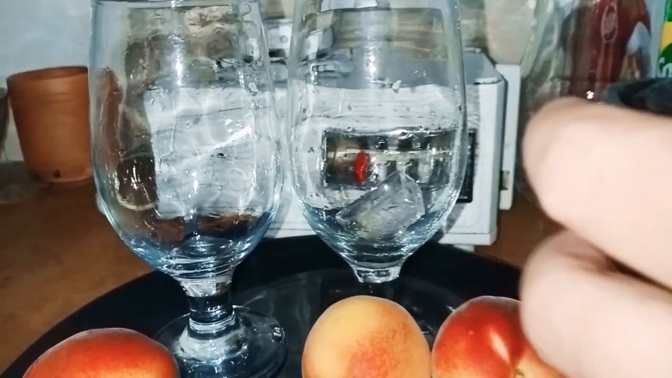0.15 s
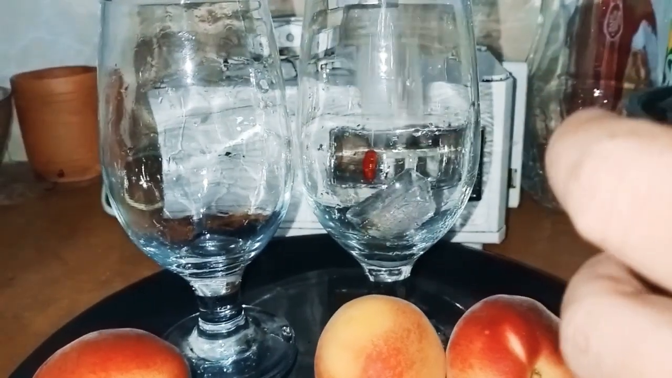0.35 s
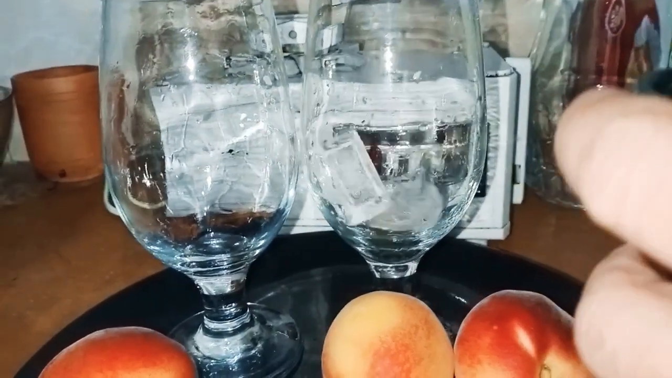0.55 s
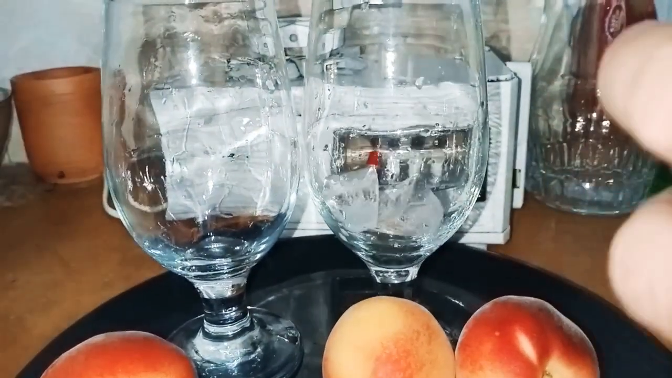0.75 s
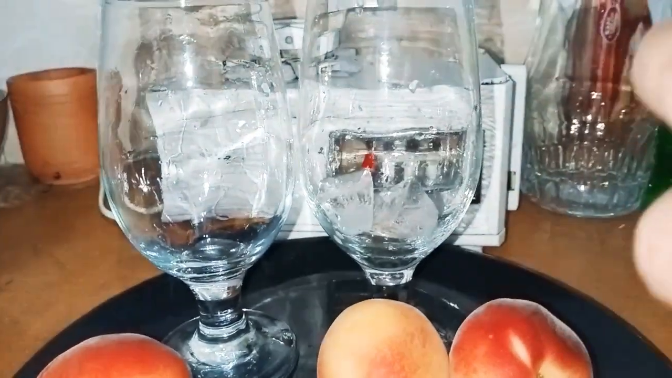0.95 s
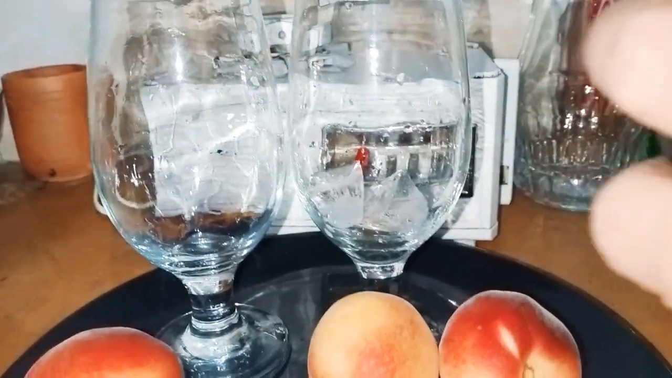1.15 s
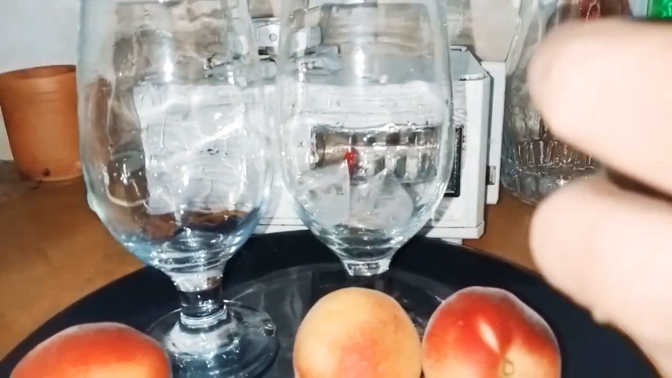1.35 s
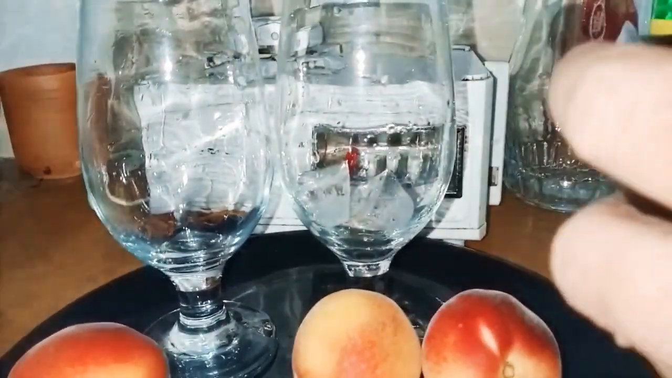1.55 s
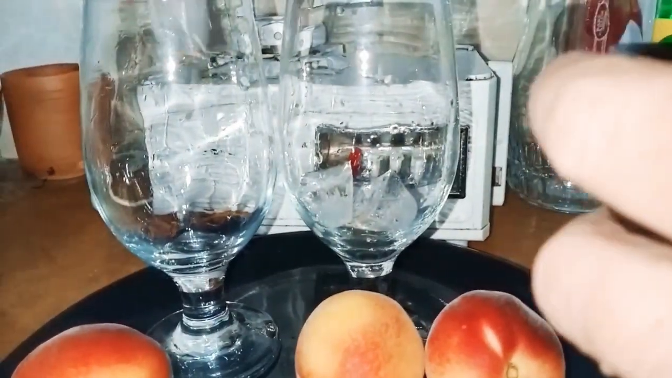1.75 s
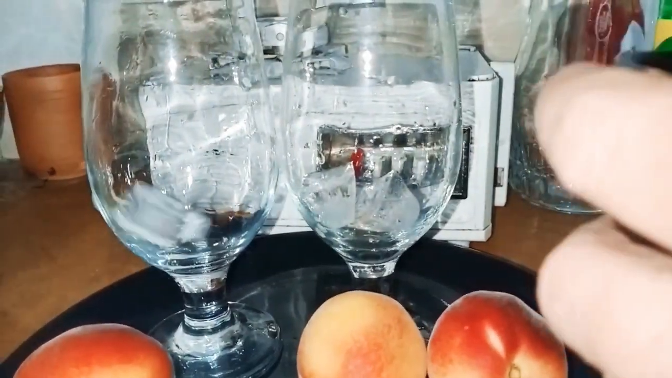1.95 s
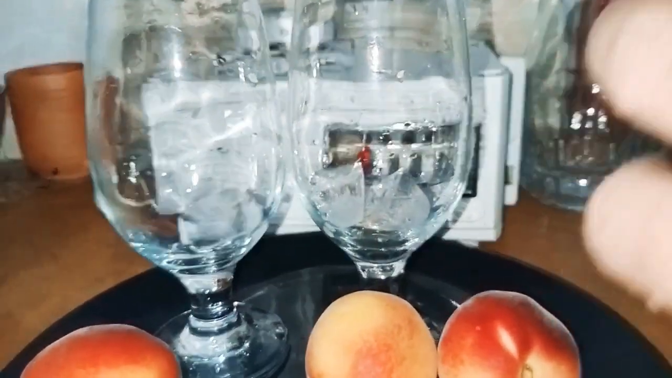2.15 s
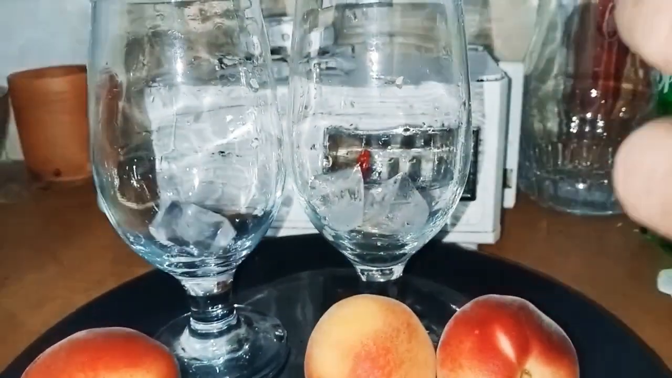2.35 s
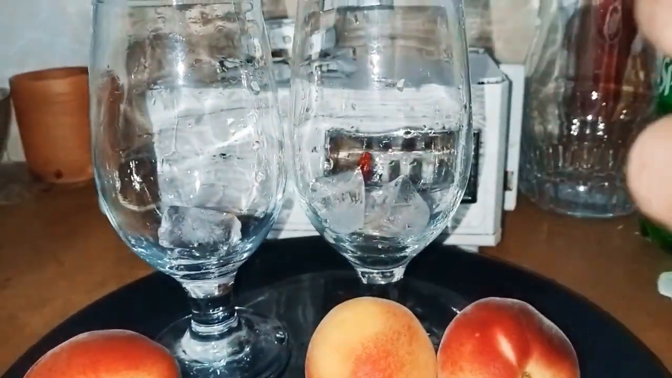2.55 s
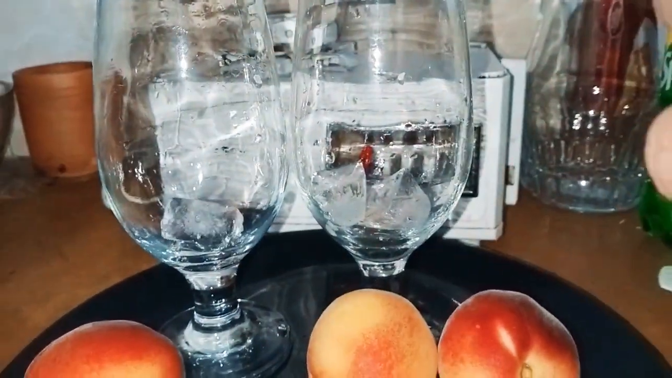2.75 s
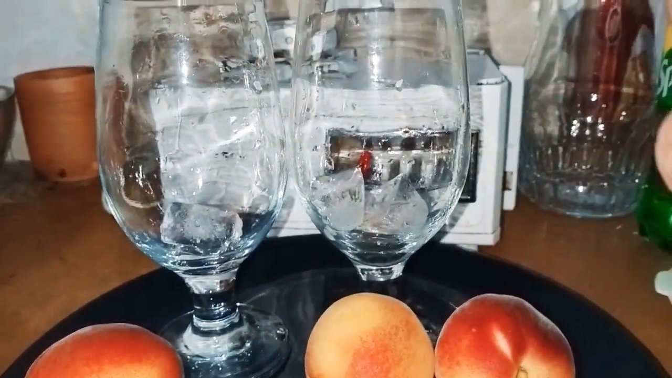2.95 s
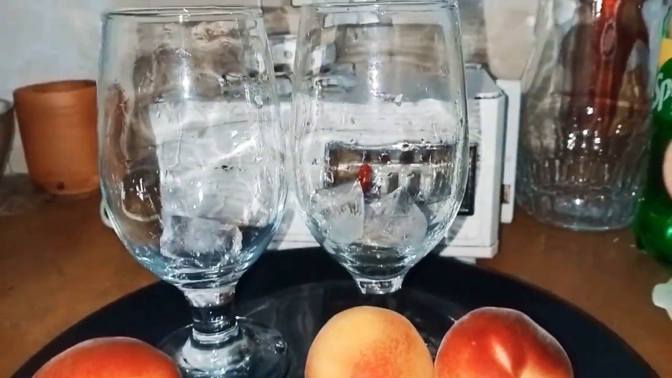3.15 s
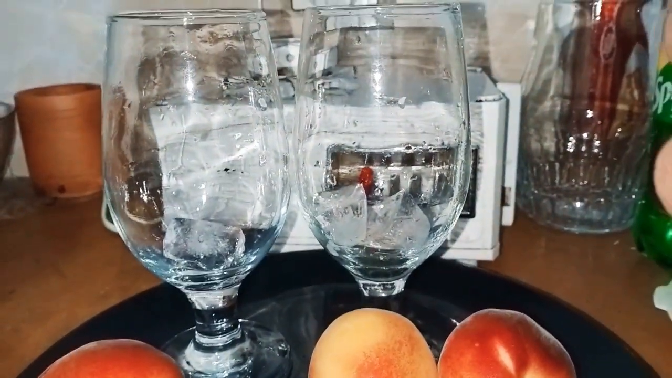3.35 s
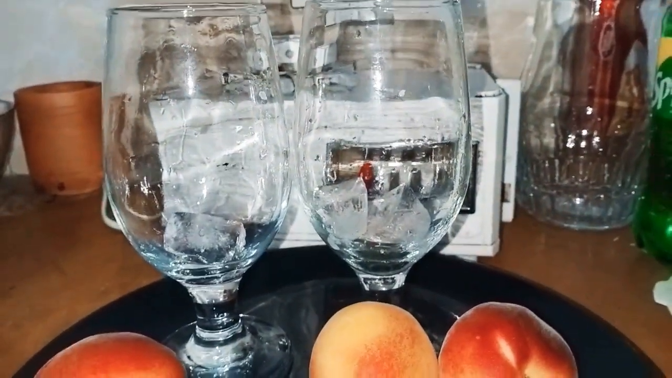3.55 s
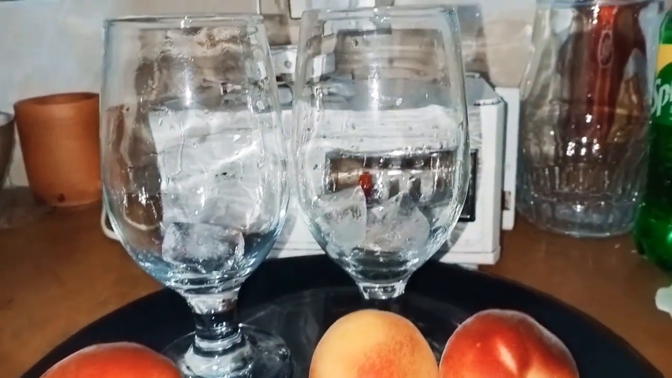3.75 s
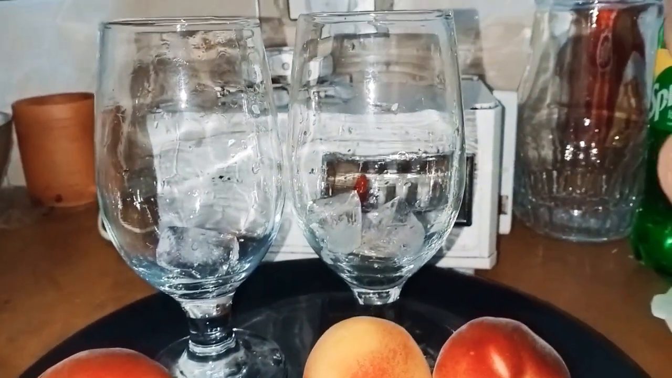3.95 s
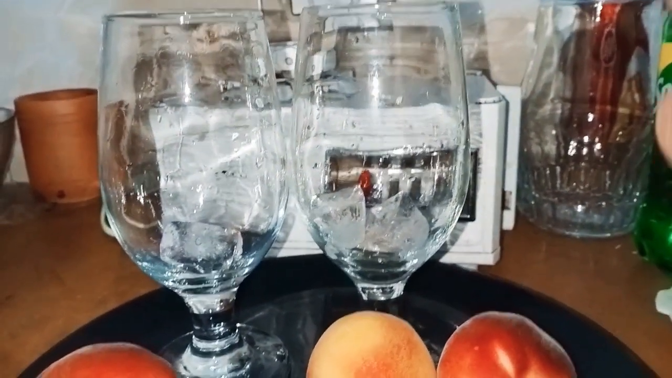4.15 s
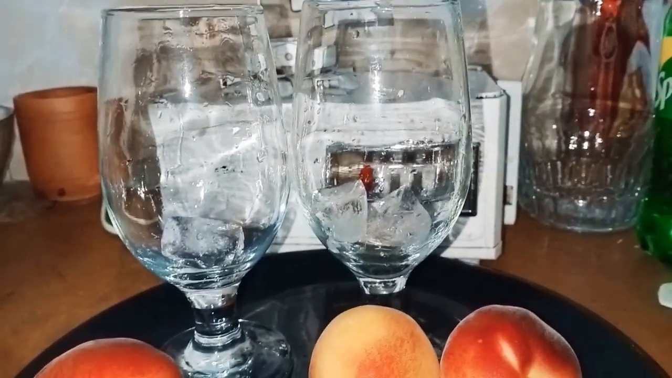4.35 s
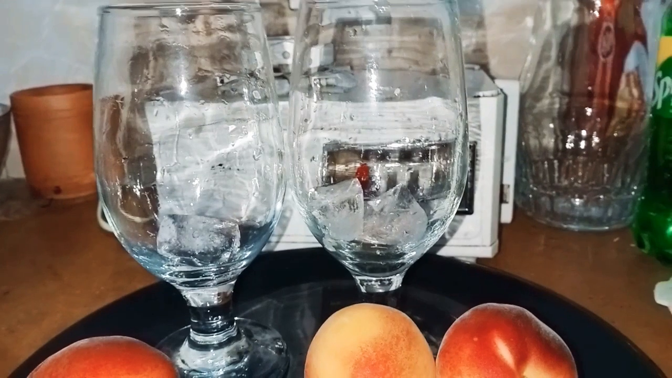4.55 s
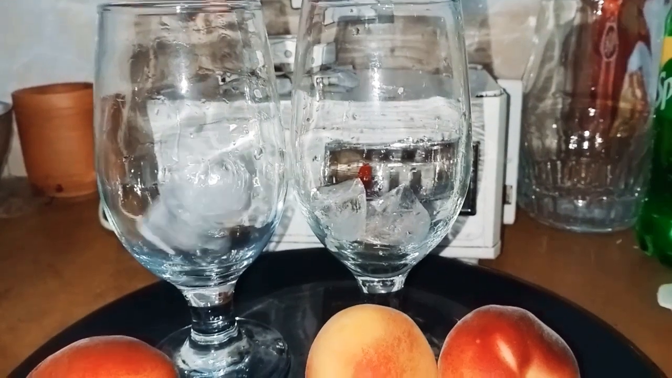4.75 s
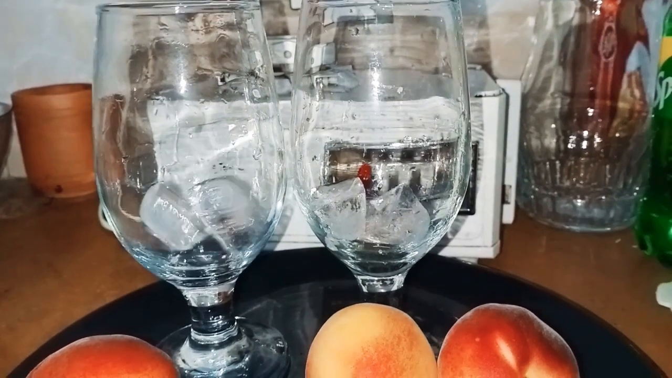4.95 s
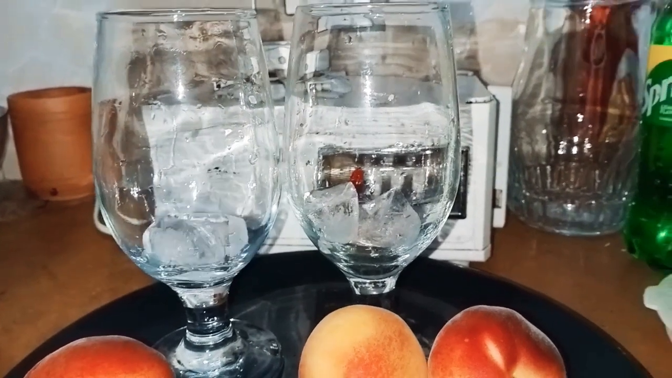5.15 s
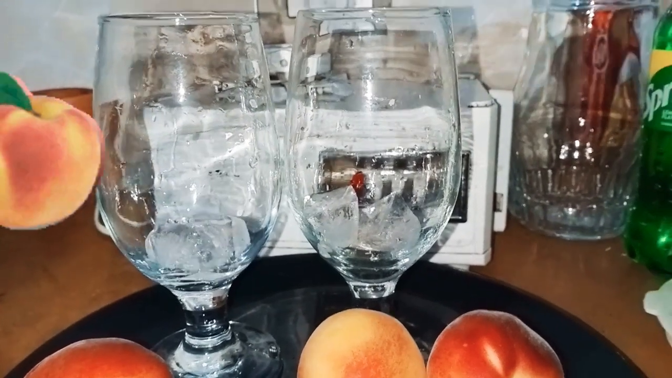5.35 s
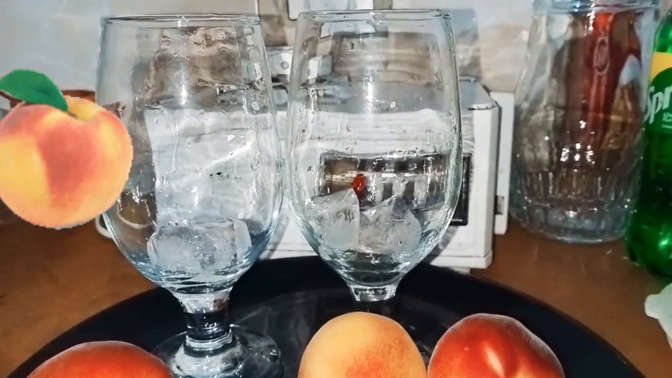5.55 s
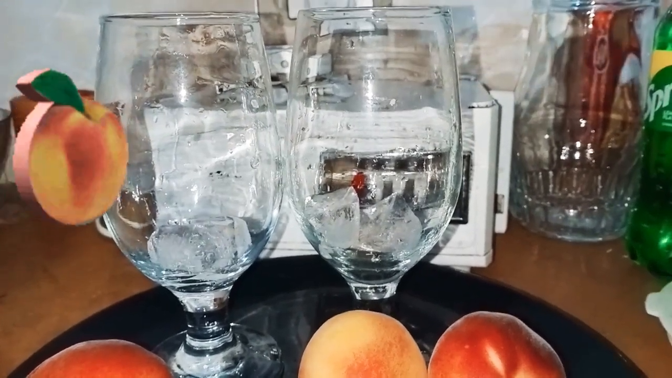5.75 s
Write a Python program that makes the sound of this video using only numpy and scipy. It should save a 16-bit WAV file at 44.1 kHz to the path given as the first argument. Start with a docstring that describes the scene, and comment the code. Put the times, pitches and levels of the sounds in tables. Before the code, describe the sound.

Close-up of ice clinking into two wine glasses in a small kitchen, bowls humming together, ice snapping quietly, sound ending abruptly.

```python
"""Kitchen counter, small hard room, one mono microphone close to two stemmed glasses that stand touching.
A low wavering rumble with faint hiss fades in. Ice cubes then drop, first into the right glass, later into the left:
contacts are noise bursts, and damped sines ring the glass while both bowls hum and beat. Ice slides as ticks,
cubes sing brief notes, and between drops the ice cracks and shifts in noise snaps. Late on, low sine thumps bump
the microphone before the last drop; the sound cuts out briefly and, after a short return, to the end."""
import sys
import numpy as np
from scipy import signal
from scipy.fft import rfft, irfft
from scipy.io import wavfile
from scipy.ndimage import uniform_filter1d, map_coordinates

SR = 44100
rng = np.random.default_rng(int(sys.argv[2]) if len(sys.argv) > 2 else 0)


def int16_out(signal):
    """Quantize to a 16-bit WAV file."""
    q = np.round(np.clip(np.atleast_2d(signal).T, -1, 1) * 32767)
    wavfile.write(sys.argv[1], SR, q.astype(np.int16))


N = 256044


def amp(db):
    """Decibels to gain."""
    return np.exp(np.asarray(db) * (np.log(10) / 20))


def unit(x):
    """x at rms 1."""
    return x / np.sqrt(np.mean(x ** 2) + 1e-20)


def along(points, hz):
    """(frequency [Hz], value) points read on a log frequency axis."""
    point_hz, values = np.transpose(points)
    return np.interp(np.log(hz + 1), np.log(point_hz + 1), values)


def wobble(rate):
    """A smooth random curve, rate knots a second."""
    knots = rng.standard_normal(int(N * rate / SR) + 4)
    return map_coordinates(knots, [np.arange(N) * rate / SR], order=2)


def noise(spectrum, size):
    """Noise of rms 1, coloured by a spectrum."""
    white = rfft(rng.standard_normal(size))
    hz = np.fft.rfftfreq(size, 1 / SR)
    return unit(irfft(white * amp(along(spectrum, hz)), size))


def add(track, s, sound):
    """Mix a sound into the track at time s [s]."""
    part = track[round(s * SR):][:len(sound)]
    part += sound[:len(part)]


def ring(modes, scatter_db, split_hz=20):
    """Damped modes, each struck at a new strength; a slight asymmetry gives each a weaker twin that beats with it."""
    t, out = np.arange(SR // 5, dtype=np.float32) / SR, 0
    for hz, db, t60 in modes:
        twin_hz = hz + split_hz * rng.uniform(-1.5, 2)
        twin_gain = np.copysign(.5, rng.normal())
        pair = np.sin(2 * np.pi * hz * t) + twin_gain * np.sin(2 * np.pi * twin_hz * t)
        sign = np.sign(rng.normal())
        out = out + sign * amp(db + scatter_db * rng.standard_normal() - 60 * t / t60) * pair
    return out


# edges [Hz] of the bass, body, treble and air bands of a contact
BAND_EDGES = [300, 1200, 4500, 10000, 16000]
BAND_FILTERS = [signal.butter(3, pair, 'band', fs=SR, output='sos') for pair in zip(BAND_EDGES, BAND_EDGES[1:])]
# what hardness does to a contact: gain [dB per dB of hardness] of bass, body, treble and air
HARDNESS_SHARE = (-.2, -0.34, 0.66, 1)


def snap(colour, band_db, hardness_db, t60):
    """A burst of dense, short-lived vibration in four bands; a harder contact has less low and more high sound."""
    t = np.arange(SR // 4) / SR
    decay = amp(-60 * t / max(t60, .002))
    attack = 1 - np.exp(-t / 0.00056)
    burst = noise(colour, size=len(t)) * decay * attack
    out = 0
    for sos, db, share in zip(BAND_FILTERS, band_db, HARDNESS_SHARE):
        out = out + amp(db + share * hardness_db) * unit(signal.sosfilt(sos, burst))
    return out


# spectrum of the room's background: (frequency [Hz], density [dB per Hz])
BACKGROUND_COLOUR = [(15, -73.5), (25, -36.5), (58, -26), (84, -10.5), (137, 1.5), (185, -14.5),
                     (217, -10.5), (373, -12.5), (695, -21), (1790, -21), (2550, -30), (3720, -25.5),
                     (5280, -39.5), (6740, -28), (16000, -58.5)]


def background():
    """Low wavering rumble of the kitchen with a faint hiss, made of coloured noise."""
    return amp(-46.5 + 0.38 * wobble(5.4)) * noise(BACKGROUND_COLOUR, size=N)


# a cube strikes the wall of a bowl:
# (time [s], knock level [dB], hardness [dB], bowl hum level [dB], bowl overtone level [dB])
CLINKS = [(0.4112, -30, 3.5, -30, -26), (.437, -31.5, 0.5, -20.5, -15), (0.5008, -33.5, 1.5, -27.5, -40),
          (0.5369, -52, -9, -53, -36.5), (0.6004, -41.5, -1, -51, -37), (.868, -51.5, 0, -36.5, -41.5),
          (0.8856, -48, -3, -71, -36.5), (1.129, -60.5, -2, -48.5, -57), (1.8849, -46.5, 12.5, -30.5, -30),
          (1.906, -29, 4.5, -37, -28), (2.0912, -35.5, -2.5, -25.5, -26), (2.3733, -55.5, -3, -31, -38),
          (4.6212, -62, 1, -59.5, -50.5), (4.8044, -34, 0.5, -27.5, -43), (5.002, -43.5, -4, -36, -47.5)]


def rebounds(count):
    """After a blow on the wall the cube touches it again at uneven gaps, weaker each time."""
    mean_gap_s, loss_per_touch_db = .012 * 1.25, 10.5
    rows = []
    for s, db, hardness_db, hum_db, overtones_db in CLINKS:
        gaps = np.cumsum(mean_gap_s / 1.25 * rng.uniform(.5, 2, count))
        for k, gap in enumerate(gaps, 1):
            loss_db = k * loss_per_touch_db
            rows.append((s + gap, db - loss_db, hardness_db, hum_db - loss_db, overtones_db - loss_db))
    return rows


# a cube lands on the bottom or on other ice: (time [s], knock level [dB], hardness [dB])
KNOCKS = [(.402, -30.5, -5), (.4232, -42, 9.5), (.4664, -41.5, 4.5), (.691, -41, 0.5), (.7241, -46.5, -6.5),
          (.9388, -57, -13), (1.882, -31, -5), (2.0187, -51.5, 2.5), (2.251, -45, -1.5), (4.7348, -28, -7),
          (4.7778, -33.5, -3.5), (5.0521, -47, 3), (5.0594, -41, -4), (5.119, -50, -8)]
# spectrum of a contact's clack: (frequency [Hz], density [dB per Hz])
KNOCK_COLOUR = [(150, -50.5), (250, -26.5), (629, -0.5), (1120, -9.5), (1450, 6), (2320, -3), (2620, -7),
                (3710, -1), (4820, -14.5), (8400, -7.5), (9170, -18.5), (10400, -16), (11900, -37.5),
                (14900, -16), (16000, -30)]
# modes of stem, foot and tray: (frequency [Hz], level [dB], t60 [s])
BASE_MODES = [(665, -6.5, 0.11), (883, -3, 0.075), (1422, -10, 0.033), (1713, -4, 0.18), (2600, -6.5, 0.23),
              (3126, -3, .15), (3610, -4.5, .15), (3850, -15, 0.14)]


def knocks(chatter):
    """Every contact clacks and shakes stem, foot and tray; the bottom gives a fuller clack than the wall."""
    base_db = 2.5  # ring of stem, foot and tray, relative to the knock
    bottom_bands, bottom_t60_s = (-9, -2.5, -9.5, -21.5), .037  # bass, body, treble, air [dB]; decay
    wall_bands, wall_t60_s = (-19.5, -1.5, -9, -13.5), .048
    contacts = [(KNOCKS, bottom_bands, bottom_t60_s), (CLINKS + chatter, wall_bands, wall_t60_s)]
    out = np.zeros(N)
    for rows, bands, t60 in contacts:
        for s, db, hardness_db, *_ in rows:
            add(out, s, amp(db) * snap(KNOCK_COLOUR, bands, hardness_db, t60))
            add(out, s, amp(db + base_db) * ring(BASE_MODES, scatter_db=3.2))
    return out


def bowl_blows():
    """Blows that reach a bowl: those on its wall, and those passed on by each landing."""
    hum_rel_db, overtones_rel_db = -14, -8  # left in the bowl by a landing, relative to its knock
    landings = []
    for s, db, hardness_db in KNOCKS:
        landings.append((s, db, hardness_db, db + hum_rel_db, db + hardness_db + overtones_rel_db))
    return CLINKS + landings


def hum_of_bowl(mode, blows):
    """The lowest mode stores the energy of every blow and lets it go slowly."""
    hz, db, t60 = mode
    fed = np.zeros(N)
    for s, blow_db in blows:
        add(fed, s, [amp(db + blow_db) ** 2])
    energy = signal.lfilter([1], [1, -amp(-60 / (t60 * SR)) ** 2], fed)
    return np.sqrt(energy) * np.sin(2 * np.pi * hz * np.arange(N) / SR)


# modes of each bowl, lowest first; t60 of all but the lowest is before the stretch in clinks:
# (frequency [Hz], level [dB], t60 [s])
RIGHT_GLASS = [(1572, 0, .8), (4205, -2, .22), (7081, -1, .09), (7158, -12, .13), (8210, -18, .18),
               (8708, -7, .13), (9905, -19, .14), (10300, -14, .15), (13432, -10, .1), (13580, -11, .1),
               (14750, -21, .2), (15250, -22, .18)]
LEFT_GLASS = [(1513, 0, 1.15), (4072, -6, .2), (4208, -6, .18), (6947, -4, .15), (7080, -9, .16),
              (8205, -13, .15), (8473, -8, .14), (8572, -2, .12), (9857, -12, .13), (10110, -13, .15),
              (10236, -11, .17), (13440, -14, .09), (14315, -15, .11), (14831, -11, .13)]


def bowl_hums():
    """The touching bowls share each blow; their lowest modes beat against each other."""
    blows = [(s, hum_db) for s, _, _, hum_db, _ in bowl_blows()]
    right = hum_of_bowl(RIGHT_GLASS[0], blows)
    left = hum_of_bowl(LEFT_GLASS[0], blows)
    return right * amp(-0.9 + 1.1 * wobble(11)) + left * amp(-1.84 + 3.6 * wobble(11))


def clinks(chatter):
    """Overtones of the struck bowl: hard contacts favour the high ones, and a fast level flutter roughens all."""
    left_from_s = 1.5  # the first cube goes into the right glass, later ones into the left
    tilt = 0.88  # dB per octave for each dB of hardness, pivoting at 7 kHz
    out = np.zeros(N)
    for s, _, hardness_db, _, db in bowl_blows() + chatter:
        glass = RIGHT_GLASS if s < left_from_s else LEFT_GLASS
        modes = []
        for hz, level_db, t60 in glass[1:]:
            tilt_db = tilt * hardness_db * np.log2(hz / 7000)
            modes.append((hz, level_db + tilt_db, t60 / 0.89))  # a little longer than listed
        add(out, s, amp(db) * ring(modes, scatter_db=1.0, split_hz=13))
    return out * amp(5 * wobble(190))


# how long the kitchen answers: (frequency [Hz], t60 [s])
ROOM = [(200, 0.75), (2000, 0.3), (8000, 0.28), (15000, 0.11)]


def room(x, wet_db):
    """Diffuse answer of the kitchen: decaying noise, drawn anew for each quarter second of sound."""
    out, step = np.zeros(N), SR // 4
    for start in range(0, N, step):
        hz, t, z = signal.stft(rng.standard_normal(SR // 2), SR, nperseg=256)
        decay = amp(-60 * t / along(ROOM, hz)[:, None])
        build_up = 1 - np.exp(-t / 0.0015)
        tail = signal.istft(z * decay * build_up, SR, nperseg=256)[1]
        add(out, start / SR, signal.fftconvolve(x[start:start + step], tail / np.linalg.norm(tail)))
    return x + amp(wet_db) * out


# cubes slide and chatter as they settle:
# (middle time [s], half length [s], typical tick level [dB], typical pitch [Hz])
SLIDES = [(0.425, 0.0071, -19.5, 3070), (1.067, 0.034, -43.5, 7700), (1.07, 0.036, -45, 2980),
          (3.74, .011, -32.5, 1850), (3.832, .025, -43.5, 2900), (5.071, 0.019, -30, 3500),
          (5.122, 0.039, -44, 3100)]


def slides():
    """Ice slipping on ice: a swell of tiny ticks, each ringing for a few cycles."""
    out, t = np.zeros(N), np.arange(SR // 100) / SR
    for s, half, db, hz in SLIDES:
        ticks = rng.standard_normal((int(half * 1200) + 3, 3))
        for when, pitch, size in ticks:
            cycles = hz * np.exp(.18 * pitch) * t
            envelope = np.minimum(cycles, 1) * np.exp(-cycles / 5)
            tick = amp(db + 5.2 * size) * np.sin(2 * np.pi * cycles) * envelope
            add(out, s + half * np.clip(when, -2, 2) / 2, tick)
    return out


# a cube that bounces free or cracks rings at its own pitch:
# (time [s], frequency [Hz], level [dB], t60 [s])
CUBE_RINGS = [(0.5002, 2704, -11.5, 0.053), (1.9056, 3070, -21.5, 0.23), (1.9065, 3353, -18.5, 0.11),
              (3.317, 5050, -19.5, 0.095), (3.318, 8270, -16.5, 0.06), (3.727, 1642, -19, 0.043)]


def cube_rings():
    """Brief sine notes of the cubes themselves, swelling within about a millisecond."""
    out, t = np.zeros(N), np.arange(SR // 4) / SR
    for s, hz, db, t60 in CUBE_RINGS:
        envelope = amp(db - 60 * t / t60) * (1 - np.exp(-t / 0.0003))
        add(out, s, envelope * np.sin(2 * np.pi * hz * t))
    return out


# span of the faint ticking among the cracks: (from [s], to [s])
TICK_SPAN = (2.8, 3.7)


def faint_ticks(count):
    """Rows like those of the cracks, scattered at random while the ice warms."""
    rows = []
    for _ in range(count):
        rows.append((rng.uniform(*TICK_SPAN), -68 + rng.normal(0, 2), -1.5 + rng.normal(0, 6)))
    return rows


# the ice cracks as it warms: (time [s], level [dB], hardness [dB])
CRACKS = [(.806, -65.5, 8.5), (2.0772, -49, 8), (2.7506, -53.5, -10.5), (2.944, -49, -4),
          (3.0687, -57.5, 3.5), (3.1305, -64, 7), (3.3167, -38, 12.5), (3.4025, -53, 5.5),
          (3.4694, -59, -10.5), (3.4806, -53.5, 0), (3.571, -48, 8), (3.6109, -63, -21.5), (3.7285, -33, 3),
          (3.9347, -68, 16)]
# spectrum of a crack: (frequency [Hz], density [dB per Hz])
CRACK_COLOUR = [(240, -54), (400, -32.5), (1070, -32), (1580, 10.5), (2020, -4), (2930, 3.5), (4580, -7),
                (5110, -12), (8370, -4.5), (9610, -29.5), (16000, -41)]


def cracks():
    """Dry snaps of warming ice, with faint ticks among them."""
    bands = (-33, 0.5, -3.5, -16.5)  # bass, body, treble, air [dB]
    out = np.zeros(N)
    for s, db, hardness_db in CRACKS + faint_ticks(count=4):
        add(out, s, amp(db) * snap(CRACK_COLOUR, bands, hardness_db, t60=0.028))
    return out


# a cube shifts against another with a dull tick: (time [s], level [dB])
SHIFTS = [(3.297, -50.5), (3.3022, -51), (3.7908, -38), (3.8073, -53), (4.0958, -52.5), (4.131, -59)]
# spectrum of a shift: (frequency [Hz], density [dB per Hz])
SHIFT_COLOUR = [(500, -42), (1500, -12), (2200, -8.5), (2900, 5), (4200, -17.5), (6000, -14), (16000, -34)]


def shifts():
    """Ice tapping ice: short ticks with one broad resonance."""
    bands = (-25, 0.5, -17, -32.5)  # bass, body, treble, air [dB]
    out = np.zeros(N)
    for s, db in SHIFTS:
        add(out, s, amp(db) * snap(SHIFT_COLOUR, bands, hardness_db=0, t60=0.017))
    return out


# something nudges the microphone: (time [s], thump level [dB])
BUMPS = [(4.557, -31.5), (4.571, -24), (4.578, -16), (4.587, -20)]
# spectrum of the rubbing click: (frequency [Hz], density [dB per Hz])
BUMP_COLOUR = [(300, -2), (700, -9.5), (2000, -15), (8000, -29), (16000, -26)]


def bumps():
    """Soft low pushes that die within a few cycles, each with a rubbing click."""
    thump_hz, click_rel_db = 161, -30  # click level is relative to the thump
    bands = [-3, -4, -4, -12.0]  # bass, body, treble, air [dB]
    out, t = np.zeros(N), np.arange(SR // 8) / SR
    for s, db in BUMPS:
        add(out, s, amp(db - 60 * t / 0.033) * np.sin(2 * np.pi * thump_hz * t))
        add(out, s, amp(db + click_rel_db) * snap(BUMP_COLOUR, bands, hardness_db=-0.5, t60=0.033))
    return out


def scene():
    """Everything reaches one microphone, heard alike on both channels; the room answers glass and ice."""
    chatter = rebounds(count=1)
    ice = knocks(chatter) + cube_rings() + slides() + cracks() + shifts()
    in_room = room(clinks(chatter), wet_db=-6.5) + room(ice, wet_db=-9)
    mono = in_room + bowl_hums() + bumps() + background()
    return np.array([mono, mono])


# spans in which the sound is on: (from [s], to [s])
OPEN = [(0, 4.855), (4.996, 5.296)]


def record(dry):
    """The microphone sheds deep bass and rounds off peaks; gaps keep only a trace of hiss, and the top is cut."""
    t = np.arange(N) / SR
    thin = signal.sosfilt(signal.butter(2, 60, 'high', fs=SR, output='sos'), dry)
    rounded = thin / (1 + (thin / amp(-1)) ** 8) ** (1 / 8)  # peaks stay below -1 dB here
    is_open = sum(1. * ((t > a) & (t < b)) for a, b in OPEN)
    gate = uniform_filter1d(is_open, size=64)
    fade_in = np.minimum(t / 0.052, 1) ** 2
    gated = rounded * gate * fade_in + amp(-100) * rng.standard_normal(N)
    return signal.sosfilt(signal.ellip(10, .2, 80, 15700, fs=SR, output='sos'), gated)


dry = scene()
out = record(dry)
int16_out(out)
```